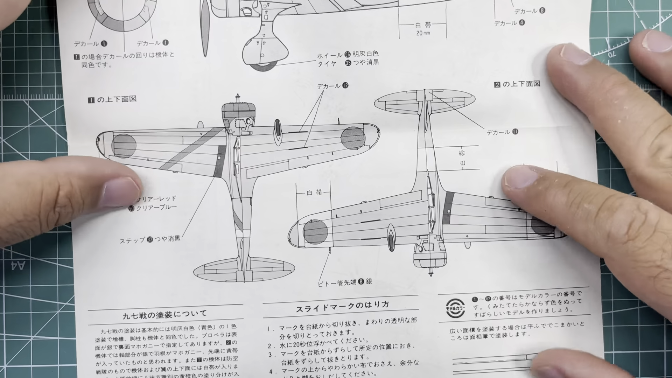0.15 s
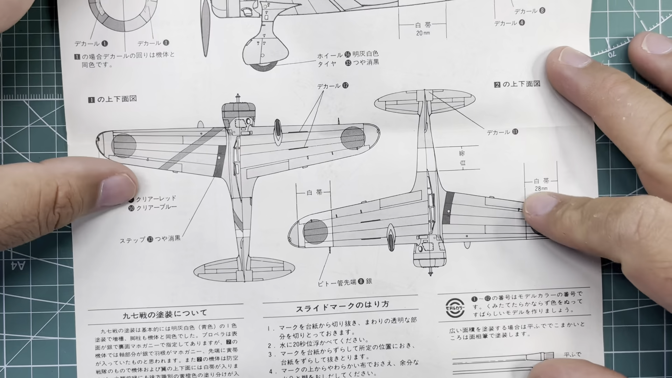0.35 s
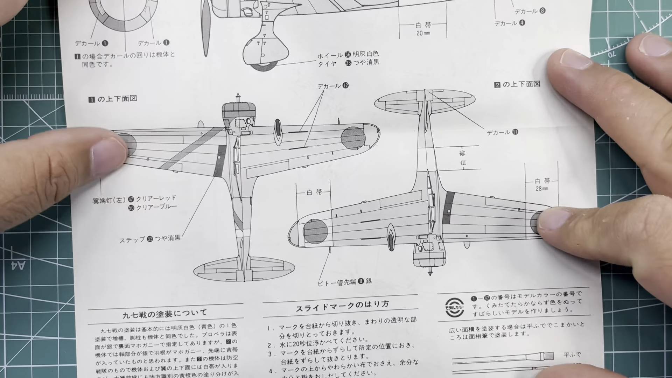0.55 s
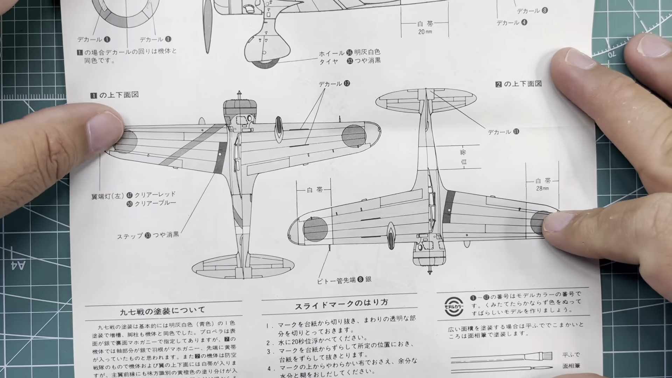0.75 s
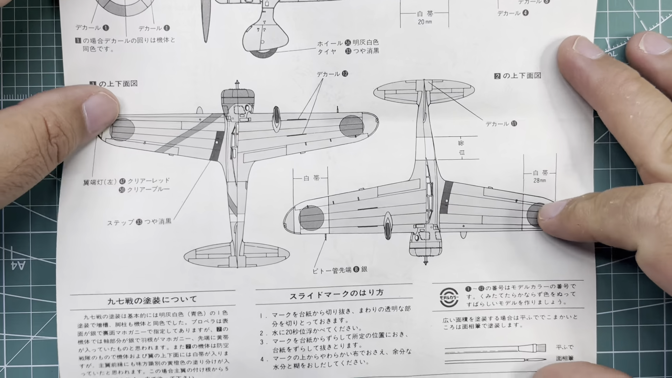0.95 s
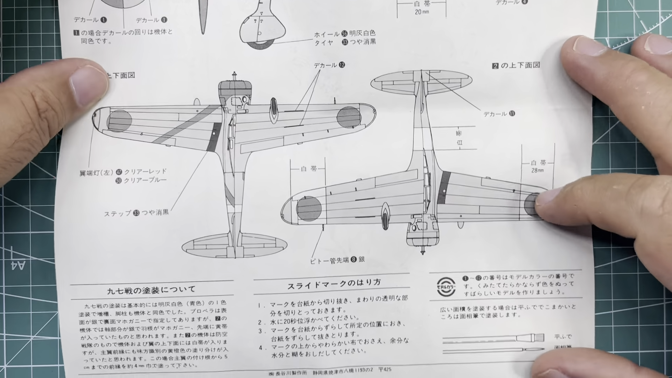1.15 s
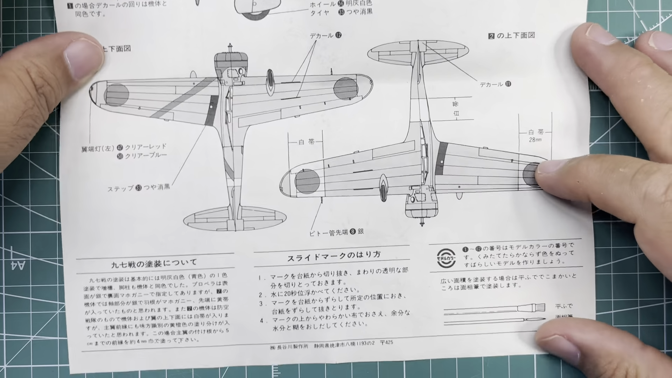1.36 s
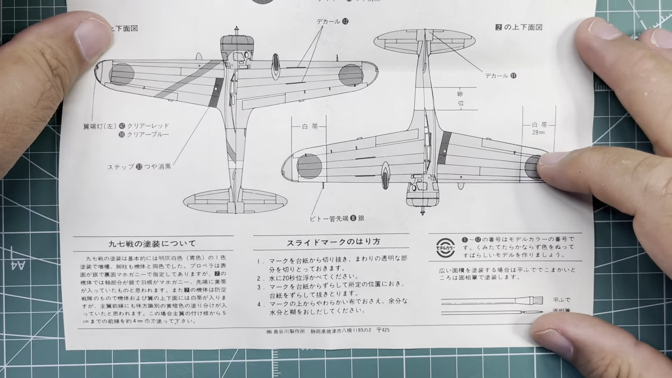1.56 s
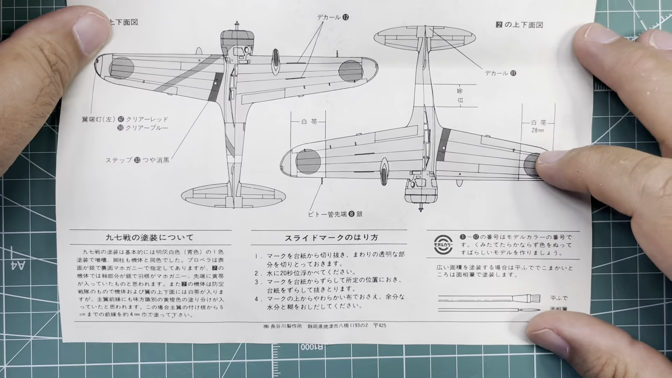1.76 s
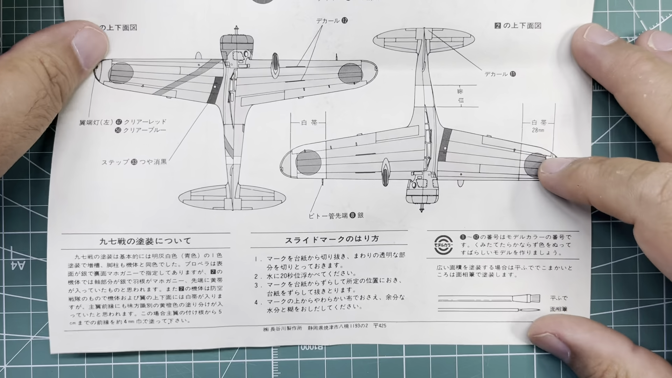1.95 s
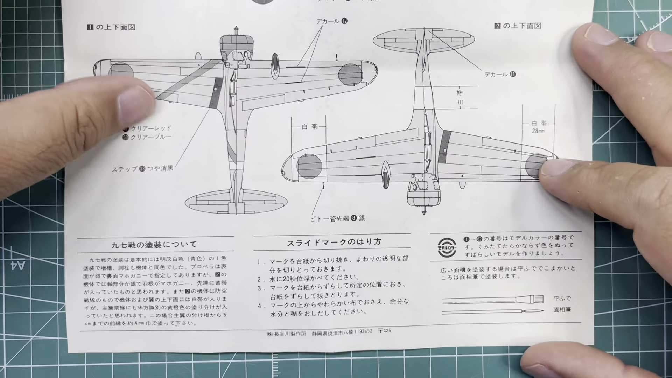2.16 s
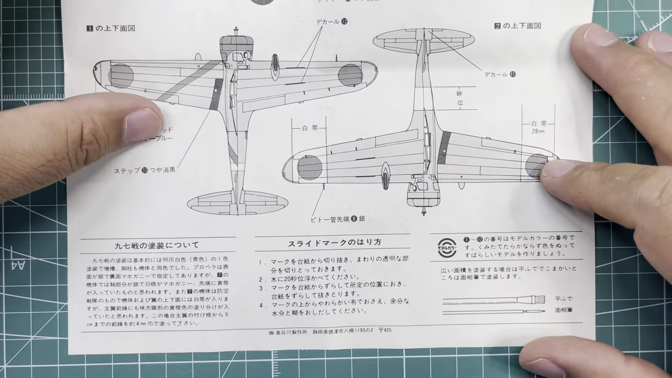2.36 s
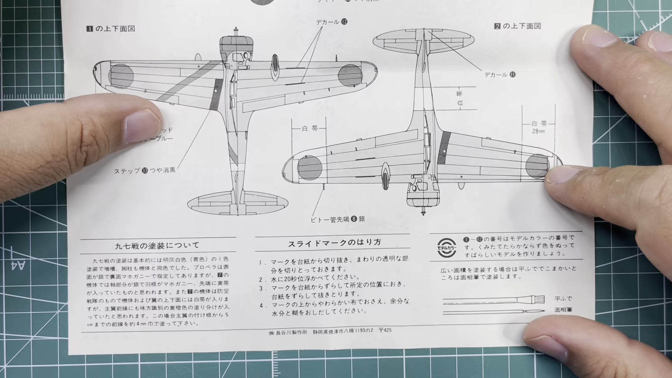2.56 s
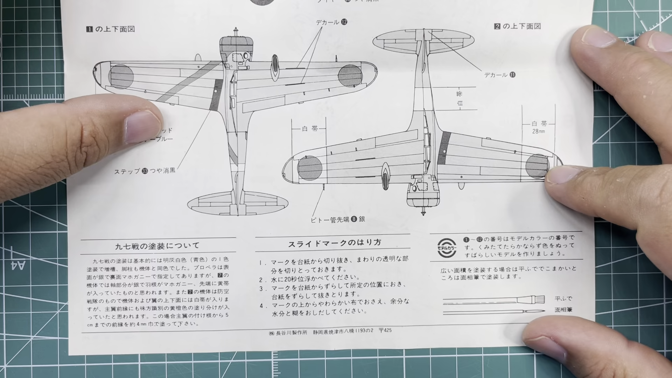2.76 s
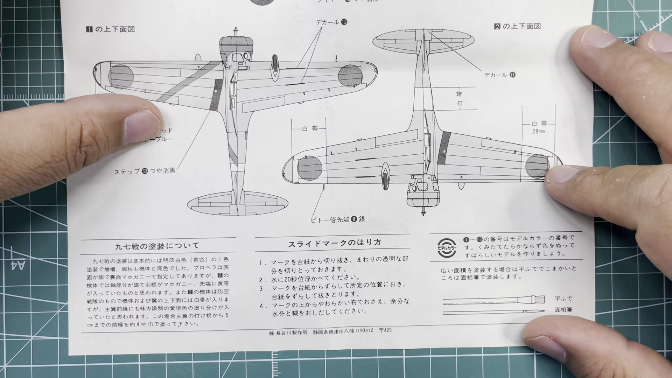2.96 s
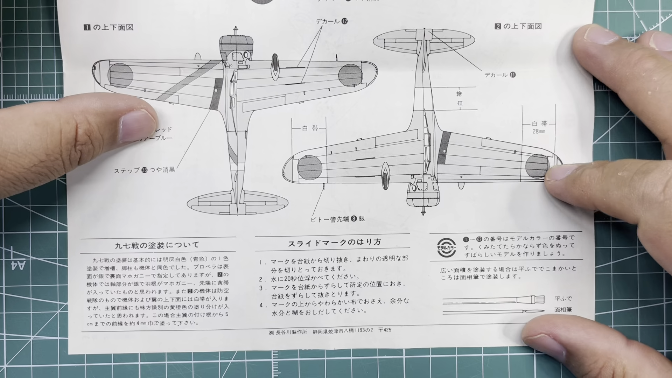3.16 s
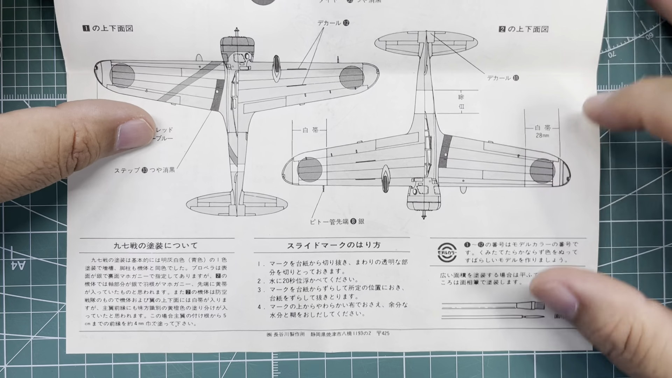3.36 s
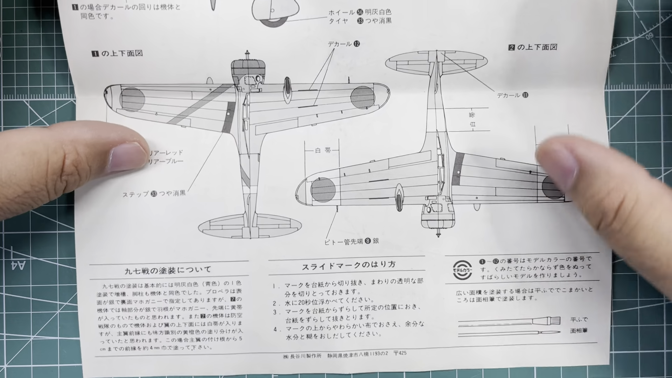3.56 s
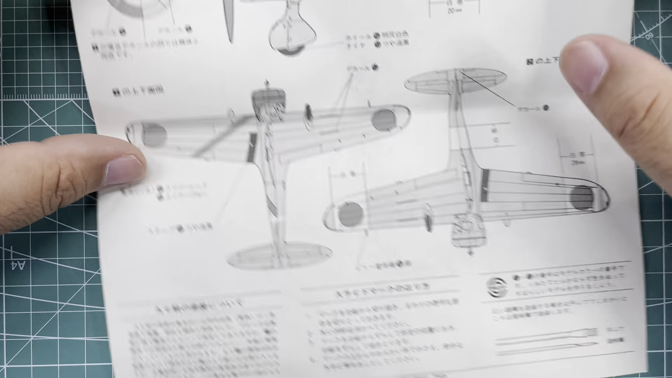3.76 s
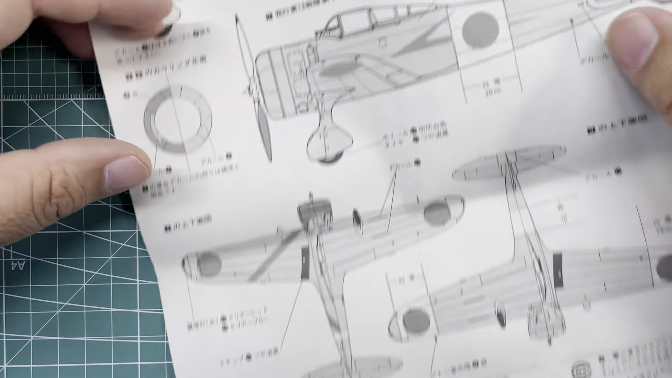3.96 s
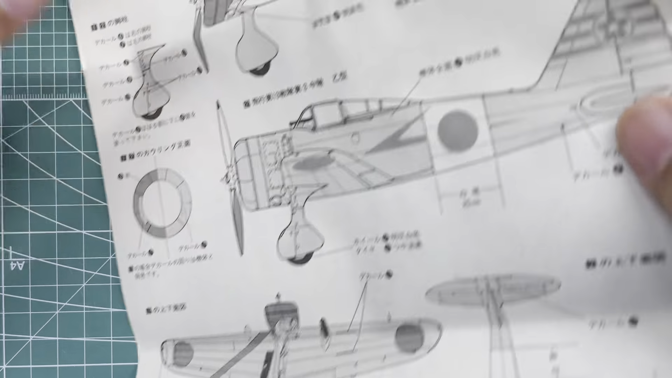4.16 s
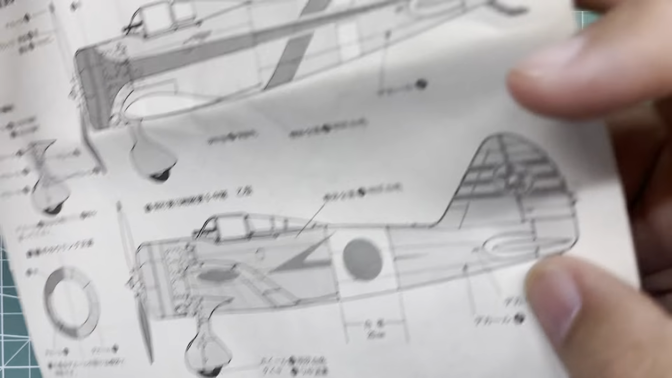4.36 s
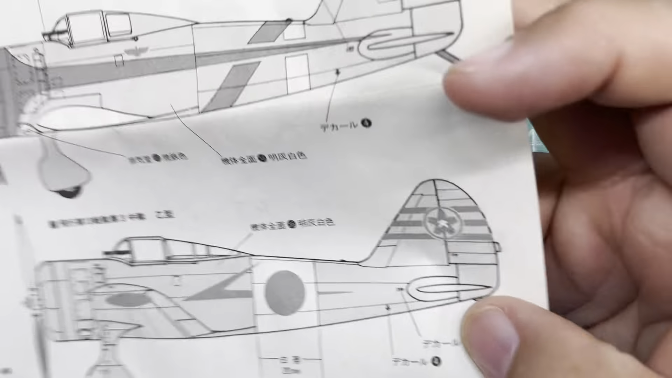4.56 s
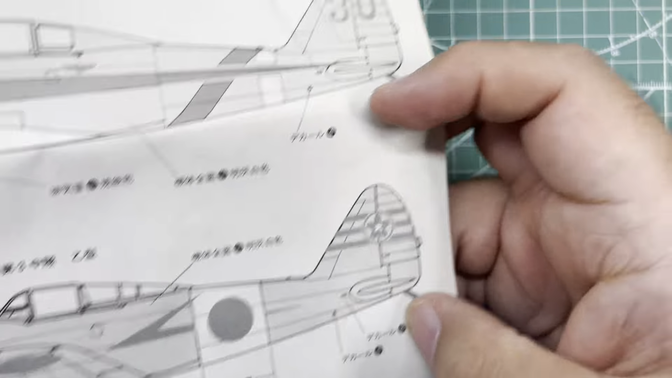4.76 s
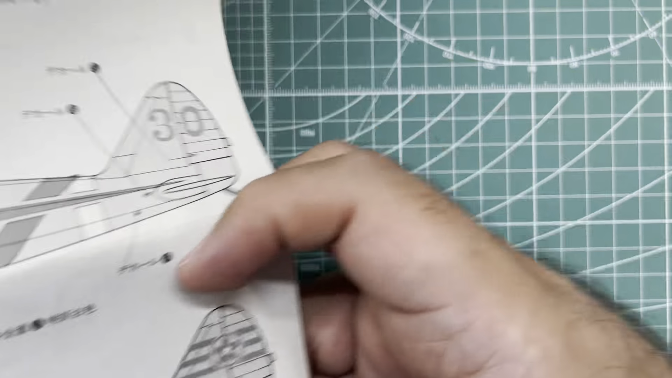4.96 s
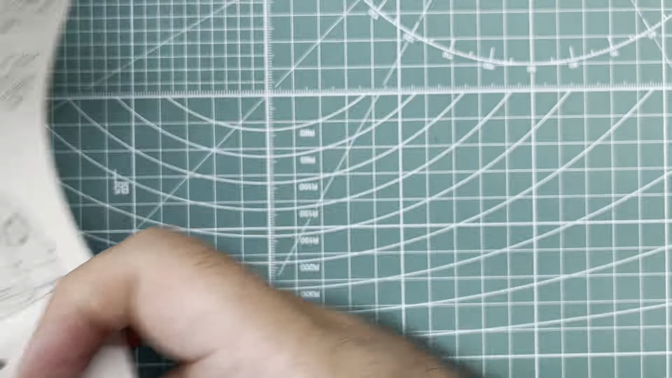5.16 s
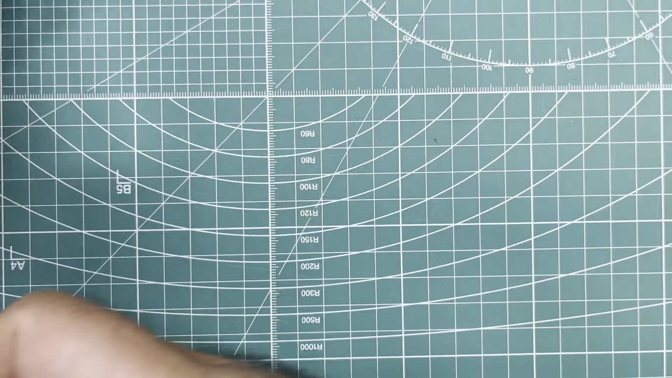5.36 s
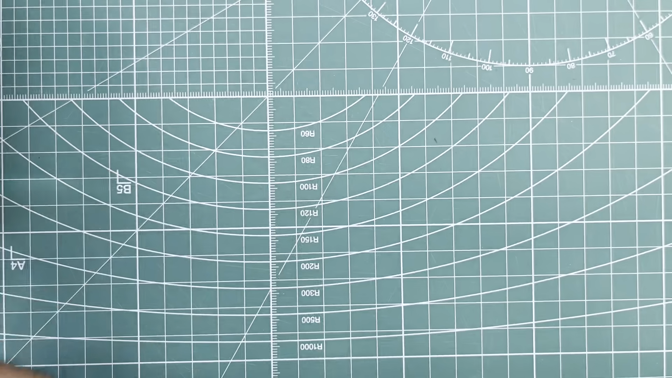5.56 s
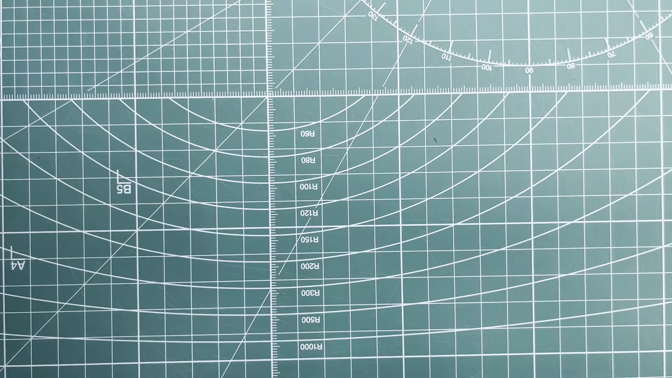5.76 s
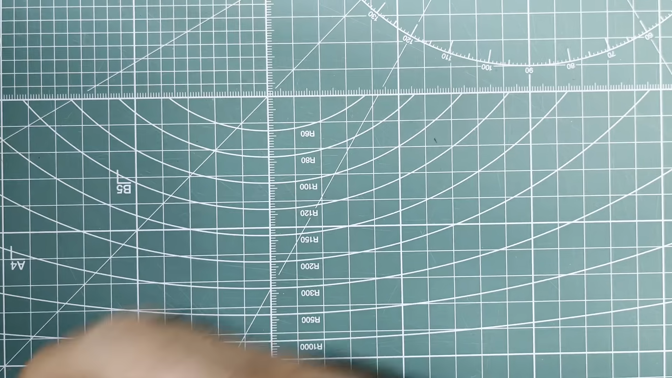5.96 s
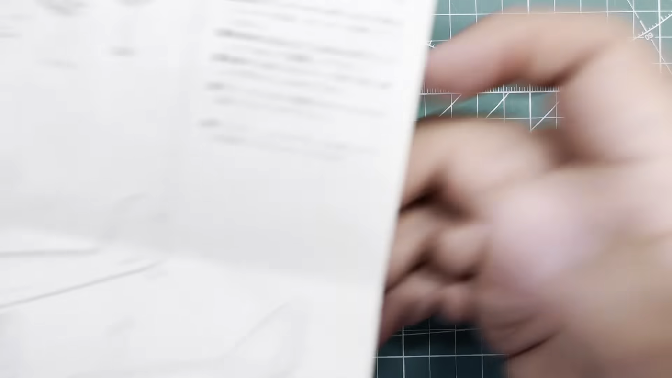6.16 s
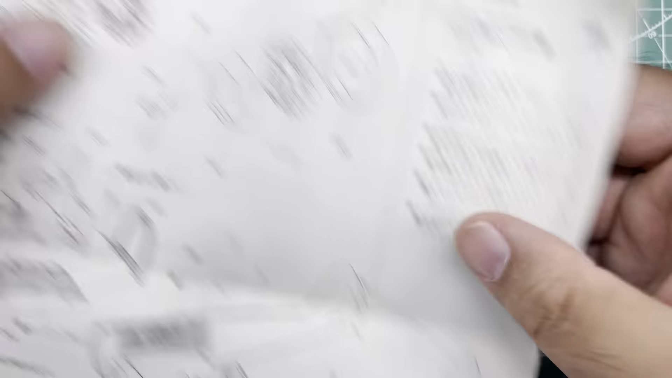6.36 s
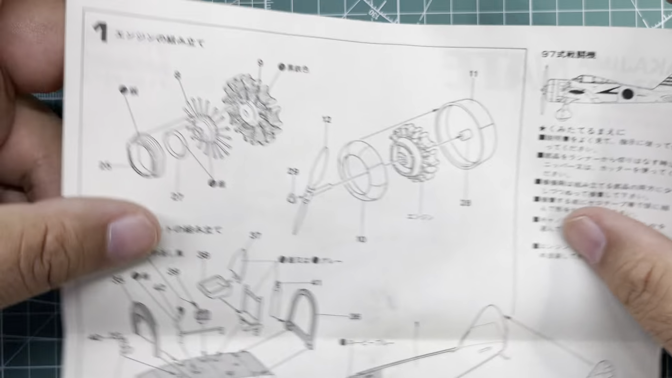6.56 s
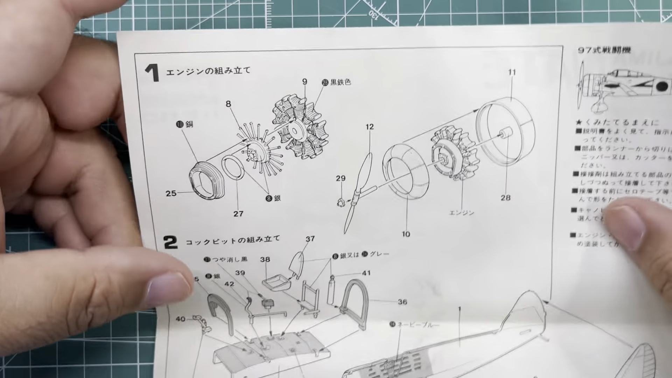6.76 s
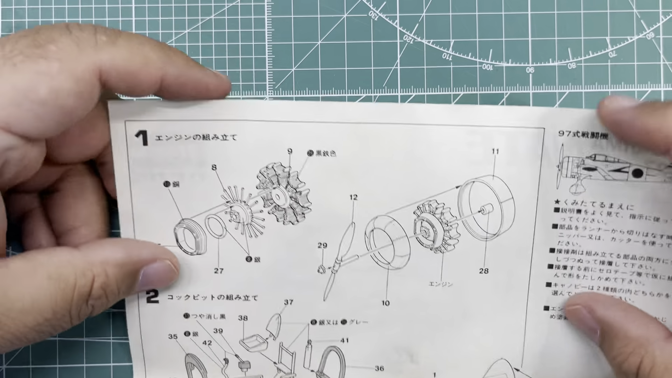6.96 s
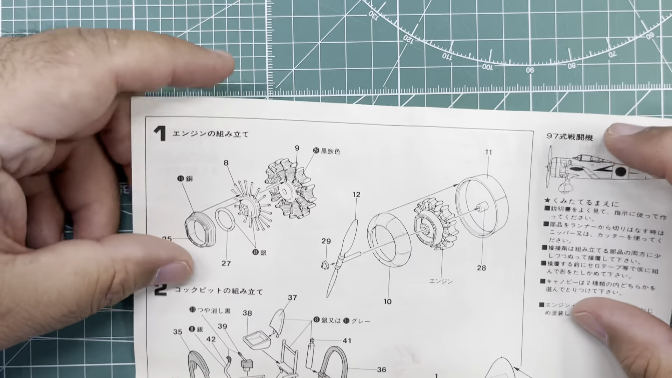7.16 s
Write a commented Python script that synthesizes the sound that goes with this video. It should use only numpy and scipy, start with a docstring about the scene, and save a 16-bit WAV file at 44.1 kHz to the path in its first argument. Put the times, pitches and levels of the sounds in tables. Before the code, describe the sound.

Close to the microphone in a quiet, faintly humming room, a stiff paper sheet is brushed and shifted on a desk mat with faint hissing strokes and small ticks. It nearly falls silent, then is lifted and turned over with much louder rustling, crisp snaps, low puffs of air and dull little knocks, ending on sharp crackles.

```python
"""Paper sheet handled at a desk

A stiff sheet slides over a desk mat under the fingertips and is then lifted, close to two microphone ports.
Shaped noise gives the sliding hiss, the rustle and the flaps of air, and short ragged bursts the creases.
Tuned resonances make taut panels sing, dying tones are the knocks, and a quiet room hums underneath.
"""
import sys
import numpy as np
from scipy import signal
from scipy.fft import rfft, irfft, next_fast_len
from scipy.io import wavfile
from scipy.ndimage import uniform_filter1d

SR = 44100
rng = np.random.default_rng(int(sys.argv[2]) if len(sys.argv) > 2 else 0)


def master(y):
    """Save y as 16-bit WAV."""
    cut = np.clip(np.atleast_2d(y).T, -1, 1)
    pcm = np.round(cut * 32767)  # scale
    wavfile.write(sys.argv[1], SR, pcm.astype(np.int16))


N = 317961
SIZE = next_fast_len(N + 4096)  # transform length, with room for filter tails
HZ = np.fft.rfftfreq(SIZE, 1 / SR)
T = np.arange(N) / SR
LIFTED = np.clip((T - 3.9) / 0.55, 0, 1)  # 0 while the sheet lies on the desk, 1 in the hands


def gain_of(db):
    """Decibels to amplitude."""
    return 10 ** (np.asarray(db) / 20)


def evened(x):
    """Scales to rms 1."""
    return x / np.sqrt(np.mean(x ** 2) + 1e-20)


def read(points, hz=HZ):
    """Reads a table on a log-frequency axis."""
    f, value = np.transpose(points)
    return np.interp(np.log(hz + 1), np.log(f + 1), value)


def curve(rows):
    """Two-column time table, sample by sample."""
    s, value = np.transpose(rows)
    return np.interp(T, s, value)


def pair(x, same):
    """Spectra of left and right, alike by the table same, from two unrelated signals."""
    a, b = rfft(x, SIZE)
    likeness = np.clip(read(same), 0, 1)
    return np.array([a, likeness * a + np.sqrt(1 - likeness ** 2) * b])


def coloured(z, spectrum):
    """Back to time through a spectrum, rms 1."""
    return evened(irfft(z * gain_of(read(spectrum)), SIZE)[:, :N])


def wander(ms):
    """Smooth random curve of rms 1 that changes within about ms."""
    span = max(int(ms * SR / 1000), 1)
    return evened(uniform_filter1d(uniform_filter1d(rng.standard_normal(N), span), span))


def shaped(x, envelope):
    """Noise under an envelope, with the energy of the envelope."""
    return evened(x * envelope) * np.sqrt(np.mean(envelope ** 2))


def swell(top_s, rise_s, fall_s):
    """Power of one swell, 16 dB down one rise before and one fall after its top."""
    distance = np.maximum((top_s - T) / rise_s, (T - top_s) / fall_s)
    return gain_of(2 * -16 * distance ** 2.1)


# Where the sheet is. Each row: time in seconds, left over right in dB.
SHEET_PLACE = [(0.0, -2.5), (1.16, 1.5), (3.67, -1.5), (5.52, 5.5), (7.21, -3.5)]


def sheet_side():
    """Left and right gains that follow the sheet sideways."""
    db = curve(SHEET_PLACE)
    return gain_of([db / 2, -db / 2])


# How alike the paper noise is on both sides. Each row: frequency in Hz, likeness from 0 to 1.
PAPER_LIKENESS = [(100, 0.86), (600, 0.49), (7000, 0.57), (8000, 0.97), (12000, 1)]


def paper_pair(x):
    """Left and right spectra of the paper, more alike in some ranges than in others."""
    return pair(x, PAPER_LIKENESS)


# Colour of the room hum. Each row: frequency in Hz, relative level in dB.
ROOM_COLOUR = [(25, -54), (45, -10.5), (92, -11), (133, -4.5), (260, -13.5), (480, -23), (600, -19.5),
               (1490, -28), (3000, -46), (9000, -73)]
# How alike the hum is on both sides. Each row: frequency in Hz, likeness from 0 to 1.
ROOM_LIKENESS = [(60, 1), (250, 0.89), (600, 0.12), (7000, 0.3), (8500, 0.79)]


def room():
    """Steady low hum of the room: coloured noise that swells a little."""
    z = pair(rng.standard_normal((2, N)), ROOM_LIKENESS)
    return gain_of(-50 + 1.73 * wander(ms=55.0)) * coloured(z, ROOM_COLOUR)


# Clean knocks of fingertip, desk and whole sheet.
# Each row: start in seconds, relative level in dB, pitch in Hz, 60 dB decay in ms.
KNOCK_HITS = [(1.0762, -40, 680, 25), (2.102, -33.5, 620, 66), (4.497, -32, 111, 83), (4.703, -27, 113, 64),
              (5.172, -23.5, 126, 47), (5.47, -15, 129, 57), (5.875, -24.5, 268, 28)]


def knocks():
    """Each knock is one dying tone that reaches its full level within half a cycle."""
    t, out = T[:8000], np.zeros(N + 8000)
    for s, db, hz, t60_ms in KNOCK_HITS:
        rise = np.minimum(t * hz / 0.5, 1)
        decay = gain_of(db - 60000 * t / t60_ms)
        at = round(s * SR)
        out[at:at + len(t)] += rise * decay * np.sin(2 * np.pi * hz * t)
    return out[:N] * sheet_side()


def crinkles(low_hz, high_hz, per_s):
    """Small dents pop in clumps, mostly tiny, each a few cycles at its own pitch."""
    clumped = per_s * gain_of(6. * wander(ms=30.))
    size = (rng.random(N) < clumped / SR) * gain_of(6.0 * np.minimum(rng.exponential(1, N), 3))
    pitches = np.geomspace(low_hz, high_hz, num=12)
    choice = rng.integers(0, len(pitches), N)
    t, out = T[:3000], np.zeros((2, N))
    for k, hz in enumerate(pitches):
        envelope = np.exp(-t * hz / 2.0) * (1 - np.exp(-t * hz / 0.11))
        pop = np.sin(2 * np.pi * hz * t) * envelope
        out[k % 2] += signal.oaconvolve(size * (choice == k), pop)[:N]
    return evened(out + 0.24 * out[::-1])  # each side leaks into the other


# Colour of the air pushed by a flap. Each row: frequency in Hz, relative level in dB.
AIR_COLOUR = [(28, -50), (48, 6.5), (70, 13), (150, -0.5), (500, -17.5)]
# Flaps of the lifted sheet. Each row: top in seconds, relative level in dB.
FLAP_TOPS = [(4.24, -38), (4.37, -41.5), (4.82, -42), (4.94, -35.5), (5.18, -35.5), (5.475, -35.5),
             (5.62, -36.5), (5.87, -43.5), (6.19, -39.5), (6.26, -45), (6.4, -40.5), (6.52, -38)]


def flap():
    """Lumpy low pushes of air and single wobbles while the sheet is off the desk."""
    z = paper_pair(rng.standard_normal((2, N)))
    wobbles = crinkles(low_hz=116.6, high_hz=612.0, per_s=72.0)
    pushes = coloured(z, AIR_COLOUR) + gain_of(-2.0) * wobbles
    power = sum(gain_of(2 * db) * swell(s, rise_s=0.031, fall_s=0.2) for s, db in FLAP_TOPS)
    return np.sqrt(power) * gain_of(-4.0 + 1.05 * wander(ms=5.0)) * pushes


# Creases snapping at once. Each row: start in seconds, relative level in dB, body pitch in Hz,
# spread in octaves, relative treble level in dB, 60 dB decay of the body in ms.
SNAP_CREASES = [(0.049, -21.5, 2100, 0.58, -19, 14.6), (0.4924, -53, 3340, 0.76, 30.5, 11),
                (0.6414, -57, 4140, 0.79, 26, 110), (0.735, -37.5, 2480, 1.7, -6, 53),
                (0.7845, -35, 4230, 1.5, 3, 15), (1.075, -27.5, 3200, 1.5, 9, 8.6),
                (1.6587, -40, 3400, 0.69, 1.5, 180), (2.101, -32, 1500, 0.95, -8, 12),
                (2.1313, -35, 1500, 0.86, -17, 20), (3.0876, -41, 2900, 1.1, -7, 15),
                (3.302, -39.5, 3260, 1.3, -17, 29), (4.021, -27, 1320, 0.46, -15, 33),
                (4.107, -25.5, 1180, 0.41, -45.5, 20), (4.225, -16, 1230, 1.53, -17, 39),
                (4.445, -46, 1500, 0.86, 23, 51), (4.596, -27.5, 735, 0.94, -20, 53),
                (4.67, -30.5, 760, 0.36, -20, 47), (4.739, -29, 950, 0.22, -18, 34),
                (4.812, -28.5, 680, 0.81, -13, 120), (4.958, -15, 2640, 0.76, -1, 7.4),
                (4.969, -20, 795, 1.6, -26, 114), (5.1416, -20.5, 1660, 0.77, 3.5, 4.2),
                (5.158, -23, 1510, 2.4, -9, 28), (5.345, -32, 1280, 0.88, -14, 73),
                (5.301, -31, 1790, 0.77, 6.5, 55), (5.4622, -7, 2100, 0.83, -40, 34),
                (5.691, -19.5, 1230, 0.34, -28, 66), (5.527, -24, 1300, 1.2, -12, 40),
                (5.974, -30.5, 2130, 1.5, 7, 19), (6.079, -43, 3040, 0.24, 19.5, 110),
                (6.1735, -35.5, 1100, 0.65, -20, 30), (6.2053, -35, 1300, 0.8, -18, 28),
                (6.223, -28.5, 2030, 0.39, -19, 19), (6.4428, -9, 1730, 0.57, 4.5, 22),
                (6.494, -27, 800, 0.88, -20, 52), (6.572, -29, 1210, 0.55, -16, 25),
                (6.613, -32.5, 1110, 0.66, -18, 55), (6.709, -20, 2300, 0.28, -23, 21),
                (6.7508, -27.5, 2400, 0.36, -29, 31), (6.9789, -15, 2140, 0.54, -35, 57),
                (6.984, -7, 2320, 0.29, -36, 6.1)]
# Creases that give way more slowly. Each row: start in seconds, relative level in dB, body pitch in Hz,
# spread in octaves, relative treble level in dB, 60 dB decay of the body in ms.
CRUMPLE_CREASES = [(4.003, -34.5, 1410, 0.39, 13.5, 93.5), (4.62, -30, 810, 0.44, 6.5, 60),
                   (5.825, -25.5, 1310, 0.85, 13, 49.5), (6.68, -26.5, 1900, 0.32, -6, 70),
                   (4.828, -35, 1400, 0.51, -20, 50), (4.923, -27, 790, 0.87, -27, 119),
                   (6.235, -28.5, 920, 0.55, -25, 80.4), (4.952, -16.5, 2450, 0.75, 3.5, 62.6),
                   (5.186, -22.5, 1640, 1.1, -33, 55), (6.399, -15.5, 1410, 0.65, -8, 85),
                   (6.514, -23.5, 1030, 0.84, -28, 90), (7.072, -20.5, 2740, 0.29, -11, 40)]
# Treble colour, of the ticks here and of the sliding hiss. Each row: frequency in Hz, relative level in dB.
HISS_COLOUR = [(3000, -12), (4500, 0.5), (16000, -2.5)]
SNAP_RISE_MS, CRUMPLE_RISE_MS = 0.87, 6.7
THUMP_DB, THUMP_HZ = -12, 302  # jolt of the whole sheet under a crease, fading out below THUMP_HZ
RAGGED_HZ = 450  # rings wider than this are driven raggedly at full strength


def crease(body_hz, spread, treble_db, t60_ms, rise_ms):
    """One crease buckles: a ragged drive excites a ring of the sheet and a bright tick."""
    size = 4096
    t, hz = T[:size], np.fft.rfftfreq(size, 1 / SR)
    a, b, ragged = rng.standard_normal((3, size))
    drive = np.array([a, 1.12 * a + 0.5 * b]) * gain_of(21.0 * uniform_filter1d(ragged, size=16))
    drive *= min(spread * body_hz / RAGGED_HZ, 1) ** 2  # a narrow ring is struck cleanly
    drive[:, round(rise_ms * SR / 1000)] += 1.3 / (1 + rise_ms)  # sudden creases crack harder

    octaves = np.log2((hz + 1) / body_hz) / spread
    thump = min(spread, 1) * gain_of(THUMP_DB) / (1 + (THUMP_HZ / (hz + 1)) ** 4)
    thump = thump / (1 + (2 * hz / body_hz) ** 2)
    ring_colour = (gain_of(-3. * octaves ** 2) + thump) / np.sqrt(hz + 50)
    ring = irfft(rfft(drive) * ring_colour)
    tick = evened(irfft(rfft(drive[[0, 0]]) * gain_of(read(HISS_COLOUR, hz))))

    rise = np.sin(np.pi / 2 * np.clip(1000 * t / rise_ms, 0, 1)) ** 2
    t_on = np.maximum(t - rise_ms / 1000, 0)  # decay starts at the top of the rise
    ring = shaped(ring, rise * gain_of(-60000 * t_on / t60_ms))
    tick = shaped(tick, rise * gain_of(-60000 * t_on / (0.38 * t60_ms)))  # treble dies first
    return ring + gain_of(treble_db - 4.0) * tick


def snaps():
    """Sudden and slower creases, followed by the short dull tail of desk and walls."""
    rows = [(*r, SNAP_RISE_MS) for r in SNAP_CREASES] + [(*r, CRUMPLE_RISE_MS) for r in CRUMPLE_CREASES]
    out = np.zeros((2, N + 4096))
    for s, db, *settings in rows:
        burst = crease(*settings)
        at = round(s * SR)
        out[:, at:at + burst.shape[1]] += gain_of(db - 7.5) * burst
    tail = rng.standard_normal((2, 6000)) * gain_of(-60 * T[:6000] / 0.056)
    tail = signal.lfilter([.5], [1, -.55], tail)
    wet = signal.oaconvolve(out, tail / np.linalg.norm(tail[0]), axes=1)
    return (out[:, :N] + gain_of(-10.5) * wet[:, :N]) * sheet_side()


def patchy(x, depth):
    """Panels of the bending sheet favour now one pitch range, now another."""
    z = signal.stft(x, nperseg=256, noverlap=192)[2]
    patches = rng.standard_normal(z.shape[1:])
    patches = uniform_filter1d(patches, size=4, axis=0)
    patches = uniform_filter1d(patches, size=24, axis=1)
    depth_db = depth * (0.28 + 0.18 * np.resize(LIFTED[::64], z.shape[2]))  # steadier while it lies flat
    z = z * gain_of(depth_db * evened(patches))
    return evened(signal.istft(z, nperseg=256, noverlap=192)[1][:, :N])


# Taut panels of the sheet. Each row: start in seconds, end in seconds, pitch in Hz, relative level in dB.
PANEL_RUBS = [(3.733, 3.89, 2720, -47.5), (5.763, 5.82, 2550, -46.5), (6.822, 6.892, 2360, -42),
              (7.003, 7.083, 2940, -44.5)]
PANEL_SHARPNESS, PANEL_DRIFT = 2.4, .09  # pitch over width of each pole, rms share the pitch wanders


def panels(slips):
    """The slips ring each taut panel while it is rubbed; its pitch wanders as the tension shifts."""
    out, drift = np.zeros((2, N)), 1 + PANEL_DRIFT * wander(ms=37.0)
    for start_s, end_s, hz, db in PANEL_RUBS:
        on = slice(round(start_s * SR), round(end_s * SR))
        turn = np.exp(2j * np.pi * np.cumsum(hz * drift[on]) / SR)
        r = np.exp(-np.pi * hz / PANEL_SHARPNESS / SR)
        # shift the pitch down to zero, smooth with two equal poles, shift it back up
        smooth = signal.lfilter([1], np.convolve([1, -r], [1, -r]), slips[:, on] / turn)
        ring = (turn * smooth).real
        fade = np.sqrt(abs(np.sin(np.pi * (T[on] - start_s) / (end_s - start_s))))
        out[:, on] += gain_of(db) * evened(ring) * fade
    return out


# Light contact of fingers and sheet between the strokes. Each row: time in seconds, relative hiss level in dB.
CONTACT_LEVEL = [(0.0, -45.5), (0.23, -64), (0.75, -55.5), (1.1, -65.5), (2.15, -54), (2.3, -77),
                 (2.65, -85), (3.07, -97), (3.1, -66), (3.7, -51.5), (4.2, -40.5), (4.85, -63),
                 (7.21, -47.5)]
# Single strokes of the sheet over mat and skin. Each row: top in seconds, rise in seconds, fall in seconds,
# relative hiss level in dB, bend (rustle over hiss) in dB.
STROKE_MOVES = [ (0.06, 0.054, 0.1, -46.5, -16), (0.915, 0.14, 0.081, -52, 1),
                (1.05, 0.093, 0.07, -48, -4.5), (1.2, 0.046, 0.098, -44.5, 0),
                (1.3, 0.064, 0.078, -42.5, -3), (1.47, 0.17, 0.097, -47, -0.5),
                (1.68, 0.024, 0.2, -55.5, 1.5), (1.85, 0.051, 0.065, -49, 1.5),
                (2.045, 0.061, 0.099, -42.5, -28), (2.222, 0.082, 0.014, -52.5, -31),
                (2.325, 0.025, 0.031, -58.5, -7), (2.39, 0.016, 0.036, -60.5, -18),
                (2.49, .01, 0.016, -73, 1), (3.264, 0.096, 0.013, -49, -14),
                (3.38, 0.034, 0.13, -55.5, 5.5), (3.53, 0.055, 0.039, -43, -1.5),
                (3.82, 0.12, 0.18, -40.5, -3.5), (3.9, 0.066, 0.3, -35.5, -17), (4.25, 0.1, 0.067, -40, -7),
                (4.485, 0.018, 0.017, -40.5, -13.5), (4.621, 0.15, 0.2, -40.5, -11.5),
                (4.8, 0.093, 0.075, -39.5, -9), (4.98, 0.098, 0.16, -47.5, 1),
                (5.1, 0.014, 0.036, -38, -11.5), (5.2, 0.08, 0.12, -66, 15),
                (5.332, 0.042, 0.027, -39.5, -7), (5.41, 0.032, 0.054, -41.5, -12.5),
                (5.544, 0.096, 0.087, -38, -3.5), (5.715, 0.066, 0.026, -30, -6),
                (5.785, 0.037, 0.037, -32.5, -19), (5.84, 0.11, 0.058, -49, 6.5),
                (5.92, 0.045, 0.22, -45, -8), (6.089, 0.0091, 0.063, -38, -12.5),
                (6.22, 0.081, 0.029, -47.5, 0), (6.381, 0.046, 0.11, -36, -8),
                (6.485, 0.081, 0.079, -34, -8), (6.69, 0.13, 0.044, -43.5, -1.5),
                (6.842, 0.074, 0.06, -35.5, -12.5), (7.04, 0.36, 0.13, -46.5, -9.5)]
CONTACT_BEND_DB = -5
BELLY_PER_BEND = 1.33  # dB of low range per dB of bend
BELLY_FLAT_DB, BELLY_LIFTED_DB = -5.5, 1.5  # the low range is stronger in the hands


def handling():
    """Gains of hiss, rustle and belly: the strokes add in power to the steady contact."""
    parts = [(gain_of(2 * curve(CONTACT_LEVEL)), CONTACT_BEND_DB)]
    for s, rise_s, fall_s, db, bend_db in STROKE_MOVES:
        parts.append((gain_of(2 * db) * swell(s, rise_s, fall_s), bend_db))

    def total(per_bend):
        """Amplitude of all parts, each weighted by its bend."""
        return np.sqrt(sum(power * gain_of(2 * per_bend * bend_db) for power, bend_db in parts))

    belly_db = BELLY_FLAT_DB + (BELLY_LIFTED_DB - BELLY_FLAT_DB) * LIFTED
    return total(0), total(1), total(BELLY_PER_BEND) * gain_of(belly_db)


# Middle range of the paper noise. Each row: frequency in Hz, relative level in dB.
RUSTLE_COLOUR = [(1000, -20.5), (1600, -2.5), (2800, 0.5), (4300, -8.5), (6500, -21)]
# Low range of the paper noise. Each row: frequency in Hz, relative level in dB.
BELLY_COLOUR = [(250, 10.5), (450, 0.5), (1000, 12), (1600, -2.5), (2400, -66)]


def rustle():
    """Fibres slip in an uneven stream; the sheet sounds it in three ranges and crinkles as it bends."""
    unevenness_db = 0.75 * wander(ms=3.4) + 1.44 * wander(ms=7.1)
    z = paper_pair(rng.standard_normal((2, N)) * gain_of(unevenness_db))
    hiss_gain, mid, belly = handling()
    body = mid * patchy(coloured(z, RUSTLE_COLOUR), depth=4.5)
    body += belly * patchy(coloured(z, BELLY_COLOUR), depth=1.5)
    small_dents = crinkles(low_hz=1400., high_hz=5300.0, per_s=320.0)
    body += mid * gain_of(-12 + 6 * LIFTED) * small_dents
    large_dents = crinkles(low_hz=600.0, high_hz=2000.0, per_s=260.0)
    body += LIFTED * belly * gain_of(-2.5) * large_dents
    body += panels(irfft(z, SIZE)[:, :N])
    hiss = hiss_gain * patchy(coloured(z, HISS_COLOUR), depth=6.0)
    return gain_of(-4.0) * (hiss + gain_of(2.0) * body * sheet_side())


def scene():
    """Room and paper together, from the background to the main source."""
    return room() + knocks() + flap() + snaps() + rustle()


# Treble resonance of both ports. Each row: frequency in Hz, gain in dB.
PORT_RESONANCE = [(6000, 0), (7200, 2.5), (9200, 12.5), (10300, 6.5), (12000, -12.5), (13000, -37)]
# Level difference of the ports. Each row: frequency in Hz, left over right in dB.
PORT_LEVELS = [(1000, 3), (6500, 4), (8200, 0)]
# Phase difference of the ports. Each row: frequency in Hz, lead of the left in radians.
PORT_LEAD = [(1000, -.1), (3000, .9), (6700, .1), (7600, 1.1), (8500, .05), (9400, -1.5), (10320, -3.14),
             (11700, -6.2), (13300, -9.4)]
EDGE_HZ = 16000  # upper band limit


def record(dry):
    """The two ports share a treble resonance but differ in level and phase; then the band limit."""
    left = gain_of(read(PORT_LEVELS) / 2) * np.exp(.5j * read(PORT_LEAD))
    sides = np.array([left, 1 / left])
    ports = irfft(rfft(dry, SIZE) * gain_of(read(PORT_RESONANCE)) * sides, SIZE)[:, :N]
    band_limit = signal.firwin(511, EDGE_HZ, window=("kaiser", 9), fs=SR)
    return signal.oaconvolve(ports, band_limit[None], "same")


dry = scene()
out = record(dry)
master(out)
```